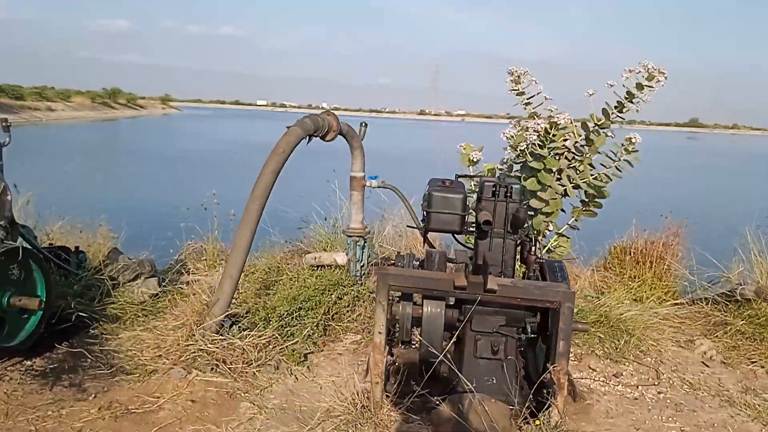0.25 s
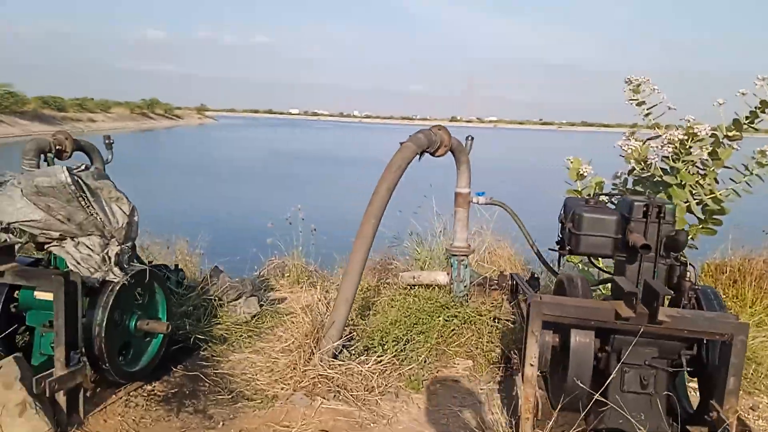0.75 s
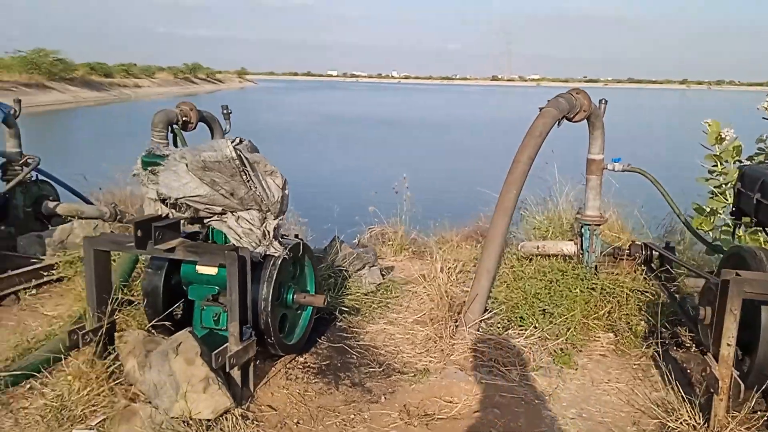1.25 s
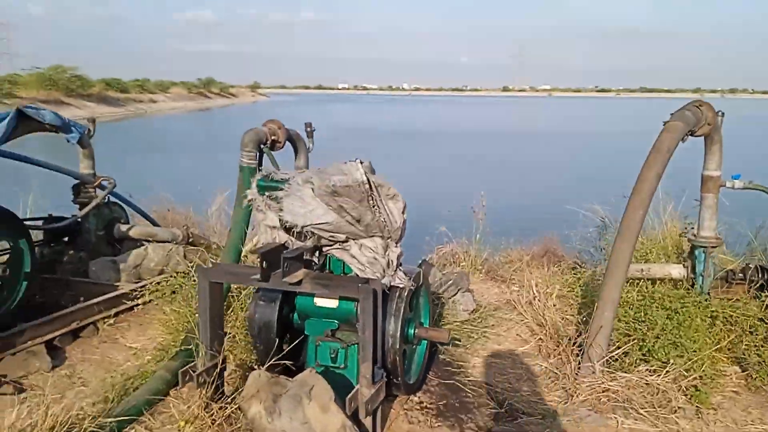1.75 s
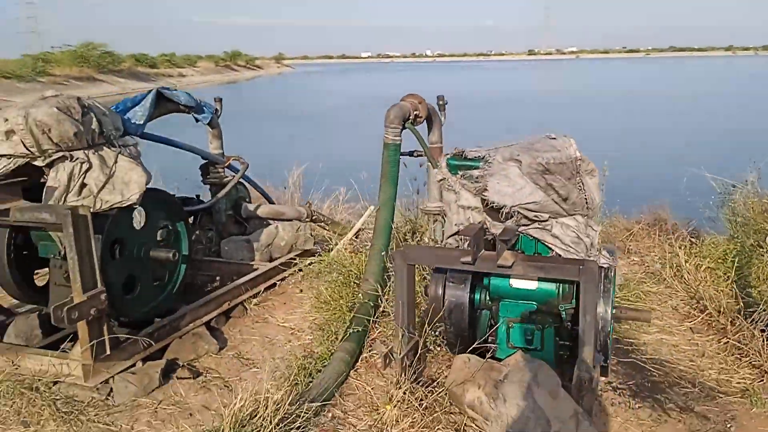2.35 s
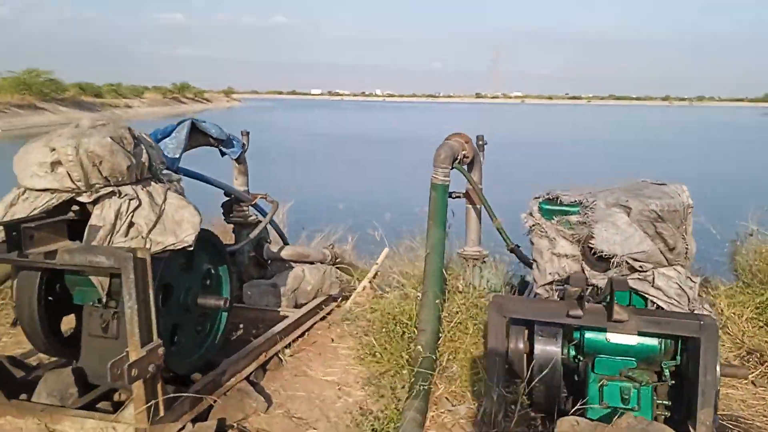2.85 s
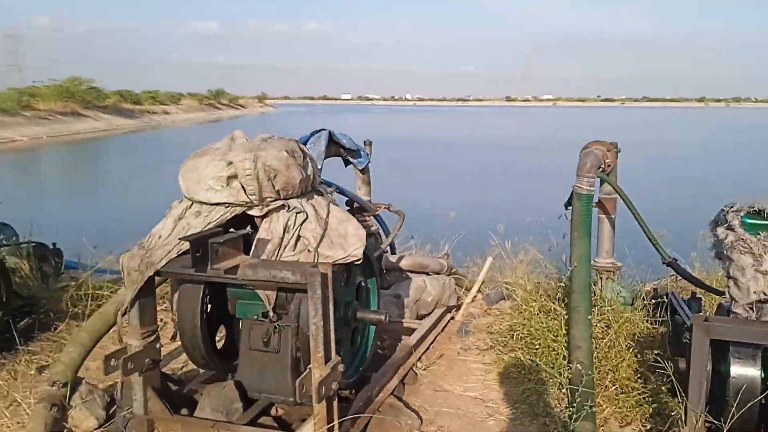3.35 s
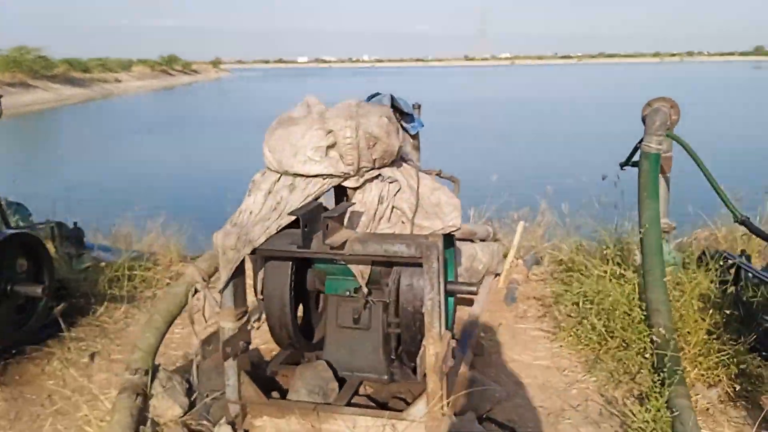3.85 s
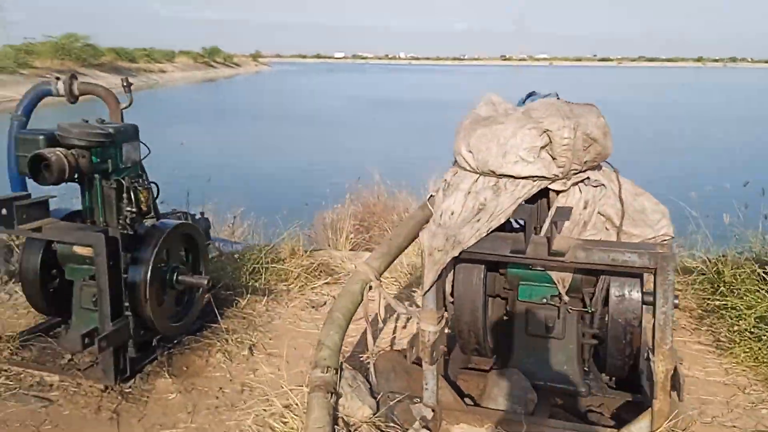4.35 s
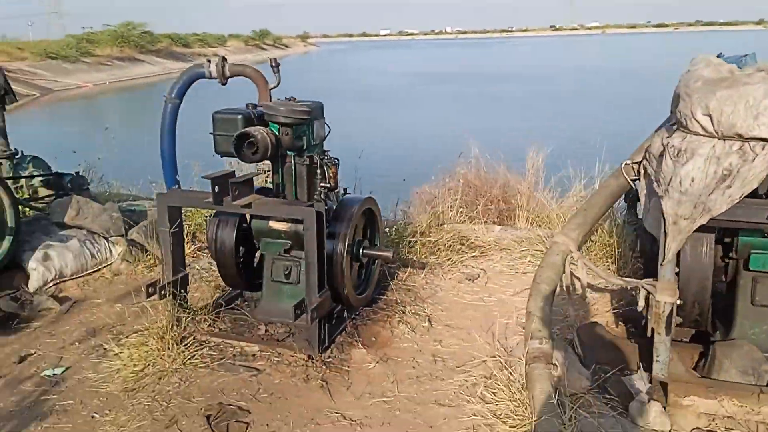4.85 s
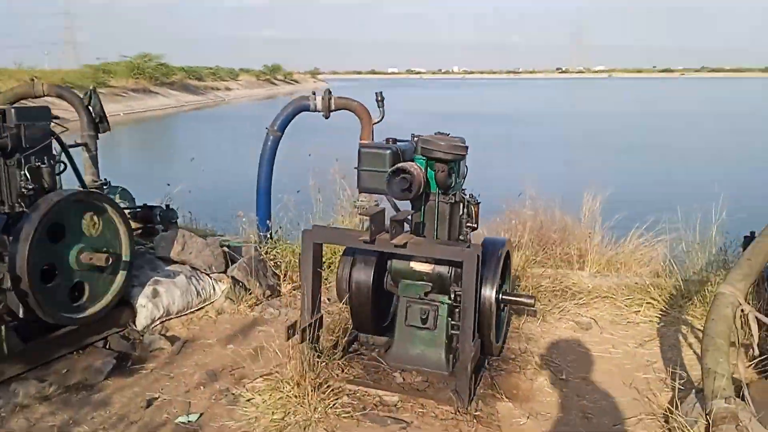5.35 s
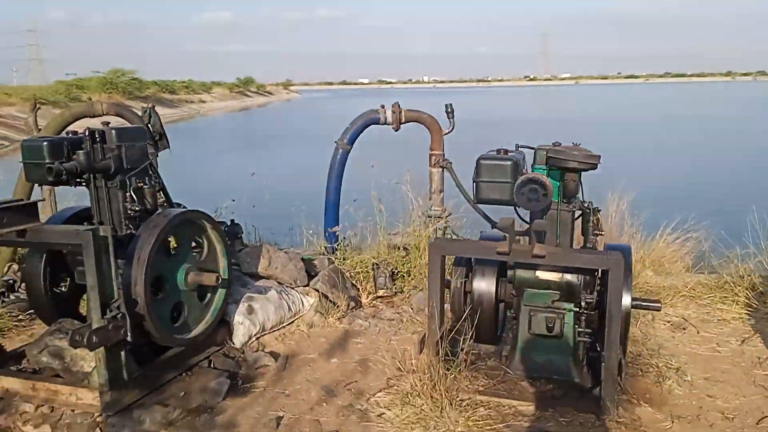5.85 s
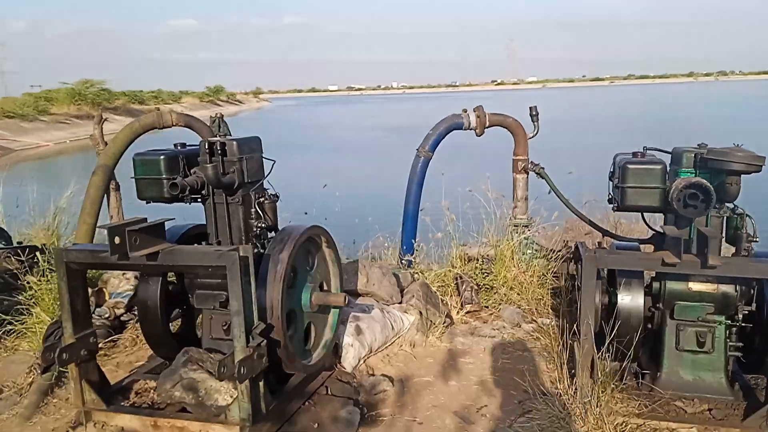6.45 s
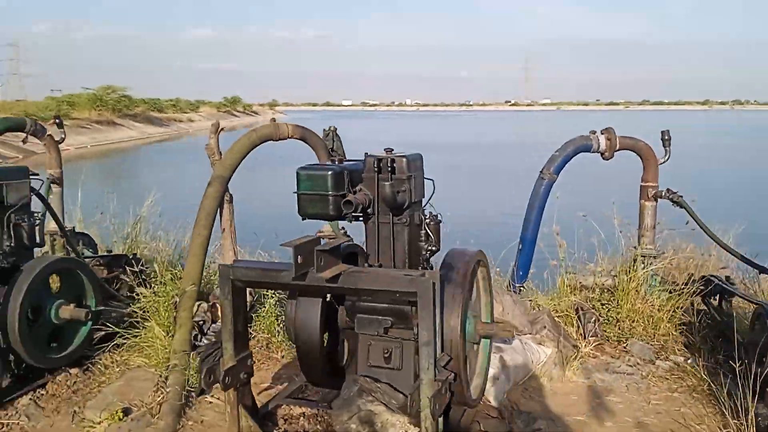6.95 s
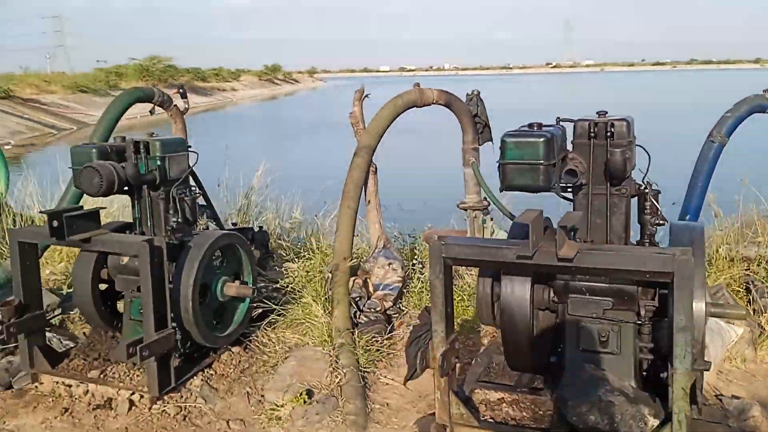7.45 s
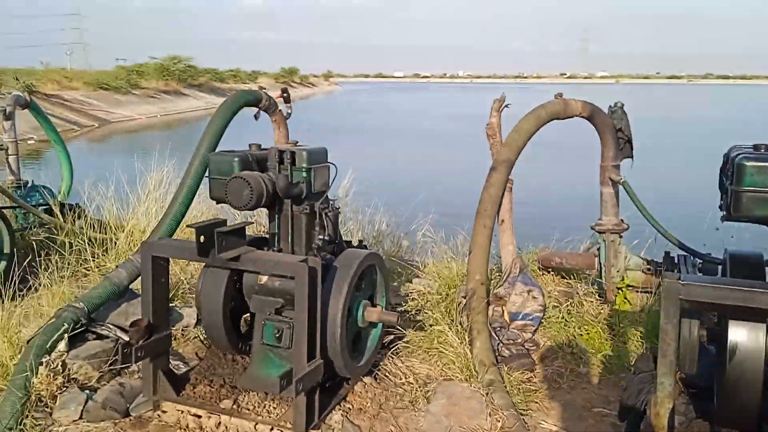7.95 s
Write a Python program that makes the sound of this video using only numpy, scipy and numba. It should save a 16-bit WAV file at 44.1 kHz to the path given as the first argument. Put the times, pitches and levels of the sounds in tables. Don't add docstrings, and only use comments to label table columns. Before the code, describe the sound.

Uneven overlapping chugging from a row of old diesel pump engines, heard close on a small phone microphone outdoors. The fastest pops about four times a second, a slower one about three and a half. Exhausts crack and hiss, iron parts ring, intakes rasp between strokes. The sound is more muted at first and grows brighter and fuller as the microphone turns, with blurred machinery rattling behind and no real pause.

```python
import sys
import numpy as np
from scipy import signal
from scipy.fft import rfft, irfft, next_fast_len
from scipy.io import wavfile
from numba import njit

SR = 44100
rng = np.random.default_rng(int(sys.argv[2]) if len(sys.argv) > 2 else 0)


def waveform_to_disk(signal):
    frames = np.transpose(np.atleast_2d(signal))
    scaled = np.clip(frames, -1, 1) * 32767
    samples = np.round(scaled).astype(np.int16)
    wavfile.write(sys.argv[1], SR, samples)


def ratio_of_db(decibels):
    return 10 ** (np.asarray(decibels, float) / 20)


N = 362061
MS = np.arange(int(.2 * SR)) / SR * 1000

# [t/s, heading from -1 to 1]
HEADING = [(0, -0.95), (.7, -0.81), (1.4, -0.53), (2.2, -0.45), (3, -0.23), (4, -0.19), (5, 0.2), (6, 0.72),
           (6.8, 0.87), (7.5, 1), (8.21, 0.81)]
# [t/s, fast engine level/dB, slow engine level/dB]
INTAKE_AIM = [(0, -39, -42), (.7, -42, -46), (1.1, -54, -42), (1.7, -51, -40.5), (2.2, -42, -43),
              (2.9, -35, -36.5), (3.6, -31, -31), (4.5, -28, -30), (5.2, -26.5, -30.5), (6.2, -24.5, -28),
              (6.8, -26.5, -31), (7.4, -32.5, -30), (8.2, -27.5, -33.5)]
# [f/Hz, width/Hz, level/dB]
DISTANT_HISS = [(4320, 510, 1.5), (6210, 1700, 6), (9700, 11000, 1.5)]


def fast_engine():
    # [first stroke/s, cycle/s, lag gathered after 8 s/s]
    timing = (.0082, .23289, .0324)
    # [t/s, gas jet level/dB, pipe mouth level/dB]
    aim = [(0, -22.5, -35), (.5, -22.5, -32.5), (1.1, -18.5, -32), (1.6, -18, -35.5), (2.2, -16.5, -27),
           (2.9, -16.5, -25), (3.6, -16, -23), (4.4, -14.5, -22.5), (5.1, -14, -22.5), (5.5, -16, -19.5),
           (6.5, -18, -21.5), (7.2, -15.5, -22), (8.2, -17, -22)]
    # [f/Hz, width/Hz, level/dB]
    jet_modes = [(4423, 1060, 4.5), (5370, 220, -7.5), (6460, 1740, 5), (7470, 380, -8), (9000, 3700, -9),
                 (10300, 10500, 4)]
    roar_modes = [(620, 250, -6), (1050, 220, -5), (1350, 300, 0), (1950, 300, -4), (2820, 320, -4.5)]
    gear_modes = [(1020, 1600, 12.5), (1800, 830, -42), (4560, 1800, 8.5), (6130, 2900, 6)]
    s = stroke_times(*timing)
    jet, pipe = follow(aim, s)
    intake = follow(INTAKE_AIM, s)[0]
    roar = by_heading(s, -22.5, -2, -1.2)
    thump = by_heading(s, -28.5, .1, 0.33)
    drone = by_heading(s, -46.5, 7.5, 1.7)

    out = strokes(s, jet + .4, -11, blow(5.8, 16, 14, -14)) * flicker(700, 2.4) * resonate(jet_modes)
    out += strokes(s, roar, -10.5, blow(5.2, 15.4, 18.4, -5.5)) * resonate(roar_modes)
    out += strokes(s, pipe + 3.9, -12, ring(414, 3.0, 34.6, 0.034))
    out += strokes(s, pipe + 2.8, -12, ring(484, 1.24, 33))
    out -= strokes(s, thump, 12.24, ring(113.4, 6.9, 57, 0.3))
    out += strokes(s, intake + 4, 63.35, ring(339.5, 1.3, 154)) * flicker(90, 0.94)
    out += strokes(s, drone, 66, ring(1040, 10, 310)) * flicker(140, 8.0)
    gear = strokes(s, jet - 19 + scatter(s, 2.2), 40.7, blow(14.6, 42, 22, -37))
    gear += strokes(s, jet - 16 + scatter(s, 2.2), 170, blow(6, 22, 15, -14))
    gear += strokes(s, jet - 24 + scatter(s, 8.7), 116.8, blow(3.4, 7.8, 7.5, -33))
    return out + gear * flicker(150, 1.03) * resonate(gear_modes)


def slow_engine():
    # [first stroke/s, cycle/s, lag gathered after 8 s/s]
    timing = (-.1808, .28879, .0118)
    # [t/s, gas jet level/dB, pipe mouth level/dB]
    aim = [(0, -24.5, -29.5), (.4, -23.5, -24), (.8, -22, -28), (1.3, -21.5, -31), (2.4, -19, -35),
           (3.2, -20, -30), (4, -19, -38), (5, -14, -37), (5.7, -12, -32), (6.2, -14, -25),
           (7, -15.5, -20.5), (7.8, -16.5, -22), (8.2, -14, -24)]
    # [f/Hz, width/Hz, level/dB]
    jet_modes = [(4340, 1100, 4), (6090, 1700, 2.5), (6980, 3400, 6.5), (8540, 360, -8), (10000, 13000, 1)]
    roar_modes = [(1130, 300, -7), (1400, 250, -10), (1800, 230, -2), (2400, 300, -5), (3050, 450, -7)]
    intake_modes = [(403, 89, 8), (563, 71, -10.5), (788, 65, -10.5), (1068, 500, 8.5), (1430, 520, -23),
                    (1810, 930, 3), (5670, 3900, 1)]
    s = stroke_times(*timing)
    jet, knock = follow(aim, s)
    intake = follow(INTAKE_AIM, s)[1]
    roar = by_heading(s, -15.5, -0.11, 1.23)
    whistle = by_heading(s, -21, -1.8, -5.6)
    thump = by_heading(s, -32, 1.4, -0.55)
    heading, = follow(HEADING, s)
    seat_ms = 219.5 + 4 * heading + 3 * heading ** 2

    out = strokes(s, jet + 1.2, -12, blow(8.5, 17, 13, -15)) * flicker(700, 2.4) * resonate(jet_modes)
    out += strokes(s, roar, -10, blow(9.5, 16, 16, -14)) * resonate(roar_modes, 2.5)
    out += strokes(s, whistle, -7, ring(1802, 1.2, 50)) * flicker(200, 0.62)
    out += strokes(s, knock, -12.5, ring(334, 4.1, 35))
    out -= strokes(s, thump, 11.9, ring(99.2, 5.7, 113, 0.16))
    out += strokes(s, intake + 4, seat_ms, blow(1.9, 19.6, 50, -6.5)) * resonate(intake_modes, 1.0)
    click = ring(1120, 1.6, 93) + 0.33 * ring(606, 2.3, 90)
    out += strokes(s, intake + 5, seat_ms, click) * np.minimum(flicker(97, 2.7), 1.6)
    upper = by_heading(s, -28, -4.0, 0.72) + scatter(s, 1.6)
    notes = ring(1410, 0.23, 75) + 0.44 * ring(1670, .3, 45) + 0.41 * ring(2085, .3, 35)
    out += strokes(s, upper, seat_ms, notes) * flicker(160, 2.4)
    gear = strokes(s, intake - 4 + scatter(s, 2.6), 56.8, blow(5.9, 55, 21, -2.5))
    gear += strokes(s, intake - 6 + scatter(s, 1.3), 115.3, blow(14, 23, 8.9, -30))
    return out + gear * flicker(120, 4.3) * resonate(intake_modes)


def third_engine():
    # [first stroke/s, cycle/s, lag gathered after 8 s/s]
    timing = (.047, .26446, -.005)
    # [t/s, gas jet level/dB]
    aim = [(0, -36), (.5, -36.5), (.9, -33), (1.4, -36), (2, -29), (2.7, -30.5), (3.2, -27.5), (3.7, -41),
           (4.1, -26.5), (4.7, -25), (5.2, -22), (5.8, -29), (6.4, -20), (7, -19.5), (8, -22)]
    # [f/Hz, width/Hz, level/dB]
    jet_modes = [(3900, 3000, 4.5), (5930, 1100, 0.5), (7510, 240, 3), (9400, 5300, 1)]
    roar_modes = [(920, 1300, 3.5), (1230, 690, 11), (1720, 290, 4), (2430, 1150, 9)]
    s = stroke_times(*timing)
    jet, = follow(aim, s)
    roar = -29.5 + .55 * (jet + 22)
    thump = -34.5 + 0.46 * (jet + 21)
    knock = by_heading(s, -22.5, 1.2, 0.93)
    crack = by_heading(s, -33, 8.1, 3.1)

    out = strokes(s, jet - 3, 0.62, blow(4.1, 11.8, 33, -9.5)) * flicker(600, 0.8) * resonate(jet_modes)
    out += strokes(s, roar, -3, blow(2.4, 19, 48, -14)) * resonate(roar_modes)
    out -= strokes(s, knock, -3.5, ring(312, 0.72, 30.3))
    out -= strokes(s, crack, -3, ring(866, 0.27, 23.4) + 0.42 * ring(640, 0.61, 28))
    return out - strokes(s, thump, 22, ring(111, 2.8, 55))


def far_engine():
    # [first stroke/s, cycle/s, lag gathered after 8 s/s]
    timing = (.024, .2569, .0043)
    s = stroke_times(*timing)
    pop = by_heading(s, -34.5, 4.4, -1.5)
    thump = by_heading(s, -38.5, .3, -.2)
    intake = by_heading(s, -42, 8, -0.87)
    lows = strokes(s, pop, 0.43, ring(175, 1.5, 38))
    lows += strokes(s, thump, 28, ring(117, 3.4, 77))
    lows += strokes(s, intake + 3, 82.3, ring(182, 2.1, 90))
    hiss = strokes(s, intake + 1.5, -2.3, blow(6, 24, 15, -4)) * resonate(DISTANT_HISS)
    return hiss - lows


def low_bump():
    # [t/s, level/dB]
    bumps = [
        (6.277, -23.5),
    ]
    s, db = np.transpose(bumps)
    return -strokes(s, db, 0, ring(104, 7.2, 65))


def bank():
    # [f/Hz, width/Hz, level/dB]
    bass_modes = [(121, 44, -14), (193, 155, 1.5)]
    pipe_modes = [(356, 47, -12), (424, 155, -4), (658, 264, -9)]
    clatter_modes = [(984, 170, -3.5), (1400, 680, 1.5), (1740, 510, 0.5), (2290, 1640, 0),
                     (2870, 1840, -1)]
    t = np.arange(N) / SR
    pipes = ratio_of_db(by_heading(t, -38, 3.5, -2))
    clatter = ratio_of_db(by_heading(t, -39, 0.71, -0.22))
    hiss = ratio_of_db(by_heading(t, -45.5, 3.5, -2.2))
    throb = flicker(28, 0.45)
    out = ratio_of_db(-47) * np.minimum(flicker(16, 2.4), 1.5) * resonate(bass_modes, 1.0, 15)
    out += pipes * (0.54 + 0.38 * rattle(24, 2.1)) * resonate(pipe_modes, 6.6, 30)
    out += clatter * throb * (0.64 + .5 * rattle(36, 4.3)) * resonate(clatter_modes, 3.95, 35)
    return out + hiss * throb * (0.48 + 0.85 * rattle(27, 1.1)) * resonate(DISTANT_HISS, 3.9, 40)


def rattle(rate, spread_db):
    s, size = rng.random((int(9 * rate), 2)).T
    db = -spread_db * np.log(size + 0.046)
    out = strokes(s * N / SR, db, 0, blow(2.6, 9, 19, 2))
    return out / np.sqrt(np.mean(out ** 2))


def castings(x, lo_hz, hi_hz, width_hz, db, count=11):
    place = (np.arange(count) + rng.random(count)) / count
    modes = lo_hz * (hi_hz / lo_hz) ** place
    wander = flicker(3, .45)
    ringing = 0
    for k, hz in enumerate(modes):
        struck = x * np.minimum(flicker(14, 7.7), 1.4)
        note_hz = hz * np.roll(wander, k * SR // 2)
        ringing = ringing + moving_band(struck, note_hz, 1. * width_hz)
    return x + ringing * ratio_of_db(db)


def turning(x):
    # [f/Hz, width/Hz, level ahead/dB, slope/dB, bend/dB]
    angle_bands = [
        (720, 120, 1, 7.5, -1.5),
        (4140, 1000, 0.5, 4, -2.5),
        (8440, 2200, 0, -3, -1),
        (13850, 4800, -1.1, -0.7, 10.5),
    ]
    t = np.arange(N) / SR
    for hz, width, *law_db in angle_bands:
        x = x + (ratio_of_db(by_heading(t, *law_db)) - 1) * band(x, hz, width)
    return x


def stroke_times(first, cycle, lag):
    beat = np.arange(0, N / SR + 1, cycle)
    s = first + beat + lag * (beat / 8) ** 3
    return s[s < N / SR]


def strokes(s, db, delay_ms, shape):
    pad = SR // 2
    out = np.zeros(N + 2 * SR)
    starts = pad + np.round((s + delay_ms / 1000) * SR).astype(int)
    for start, gain in zip(starts, ratio_of_db(db)):
        out[start:start + len(shape)] += gain * shape
    return out[pad:pad + N]


def blow(rise_ms, hold_ms, tail_ms, tail_db):
    opening = 1 - np.exp(-(MS / rise_ms) ** 2)
    emptying = np.exp(-(MS / hold_ms) ** 4)
    return opening * (emptying + ratio_of_db(tail_db) * np.exp(-MS / tail_ms))


def ring(hz, rise_ms, t60_ms, glide=0.):
    swell = (1 - np.exp(-MS / rise_ms)) ** 2 * ratio_of_db(-60 * MS / t60_ms)
    phase = 2 * np.pi * np.cumsum(hz * (1 + glide * MS / 30)) / SR
    return swell / swell.max() * np.sin(phase)


def resonate(modes, patchy_db=3, rate=45):
    out = 0
    for hz, width, db in modes:
        noise = rng.standard_normal(N)
        mode = band(band(noise, hz, width), hz, width) * flicker(rate, patchy_db)
        out = out + ratio_of_db(db) * mode / mode.std()
    return out / out.std()


def flicker(rate, depth_db):
    steps = rng.standard_normal(int(1.3 * rate * N / SR) + 2)
    return np.interp(np.arange(N) * rate / SR, np.arange(len(steps)), ratio_of_db(depth_db * steps))


def scatter(s, spread_db):
    return spread_db * rng.standard_normal(len(s))


def follow(curve, s):
    at, *columns = np.transpose(curve)
    return [np.interp(s, at, column) for column in columns]


def by_heading(s, ahead_db, slope_db, bend_db):
    heading, = follow(HEADING, s)
    return ahead_db + slope_db * heading + bend_db * heading ** 2


def band(x, hz, width):
    return signal.lfilter(*signal.iirpeak(hz, hz / width, SR), x)


@njit
def moving_band(x, hz, width):
    y, b, low = np.empty(len(x)), 0., 0.
    for i in range(len(x)):
        g = np.tan(np.pi * hz[i] / SR)
        k = width / hz[i]
        v = (b + g * (x[i] + 1e-18 - low)) / (1 + g * (g + k))
        b = 2 * v - b
        low = low + 2 * g * v
        y[i] = k * v
    return y


def scene():
    near = castings(fast_engine(), 1556, 9310, 86, 4.4)
    near = near + castings(slow_engine(), 2051, 9270, 65, 0.99)
    rest = castings(third_engine(), 486, 9240, 110, 2.0, count=8)
    rest = rest + far_engine() + low_bump() + bank()
    return turning(near + rest)[None]


def roll_off(x):
    return signal.sosfilt(signal.butter(12, 17130, fs=SR, output="sos"), x)


def record(dry):
    # [f/Hz, level/dB]
    mic = [(30, -7), (60, 8), (100, 1.5), (3600, -3.5), (8500, 0.5), (11000, -7.5), (13600, -17.5),
           (15300, -0.5)]
    mic_hz, mic_db = np.transpose(mic)
    size = next_fast_len(N)
    hz = np.maximum(np.arange(size // 2 + 1) * SR / size, 1)
    colour = ratio_of_db(np.interp(np.log(hz), np.log(mic_hz), mic_db))
    x = irfft(rfft(dry, size) * colour, size)[:, :N]
    x = 0.55 * np.tanh(x / 0.65)
    x = signal.sosfilt(signal.ellip(10, .3, 55, 15750, fs=SR, output="sos"), x)
    return roll_off(x)


dry = scene()
out = record(dry)
waveform_to_disk(out)
```